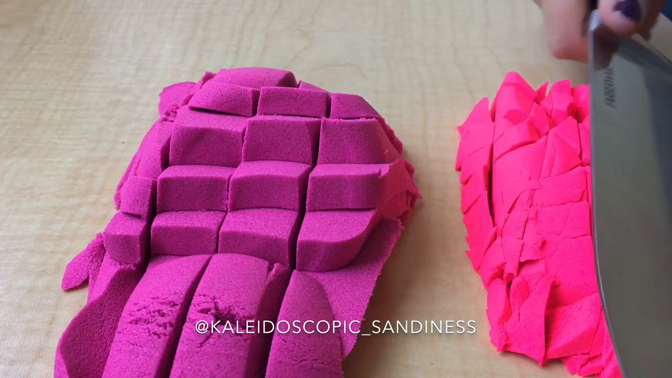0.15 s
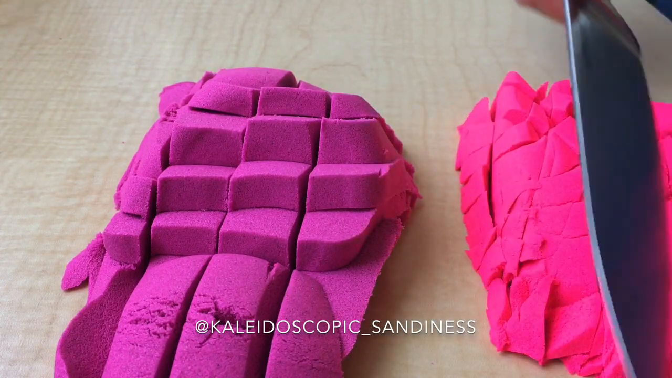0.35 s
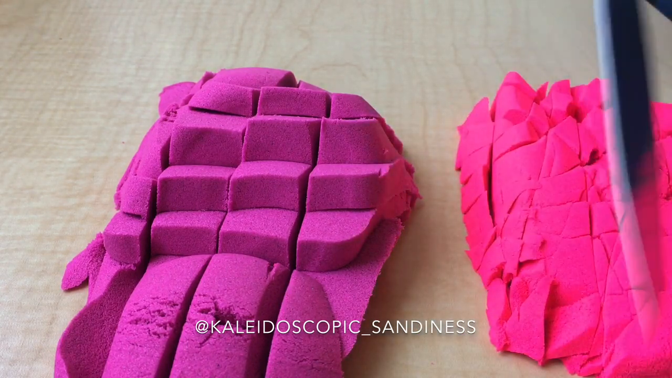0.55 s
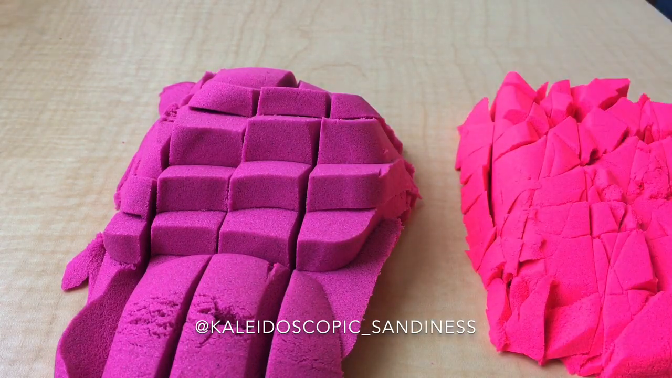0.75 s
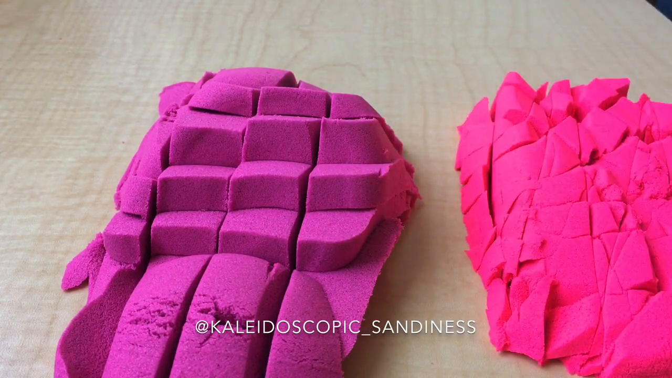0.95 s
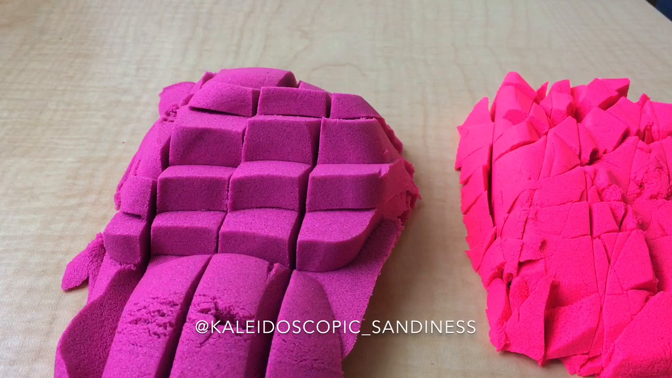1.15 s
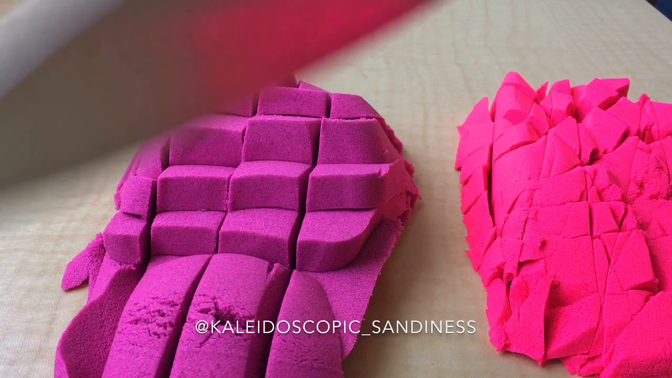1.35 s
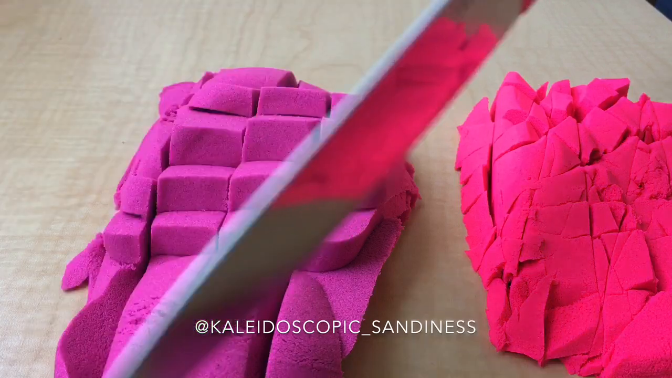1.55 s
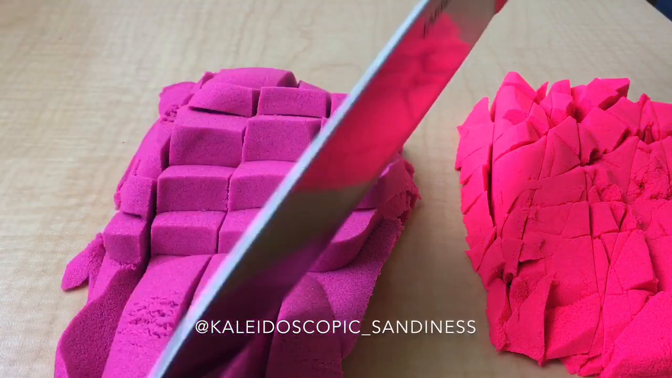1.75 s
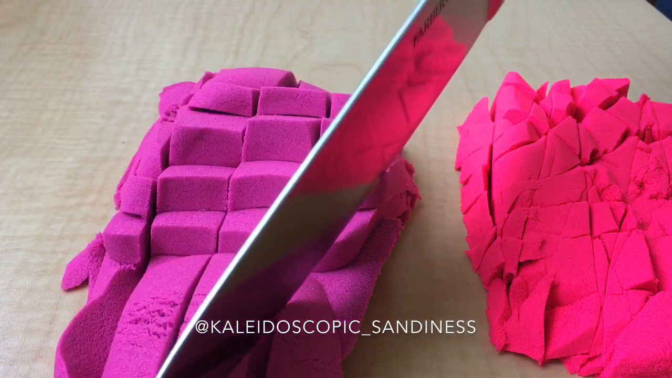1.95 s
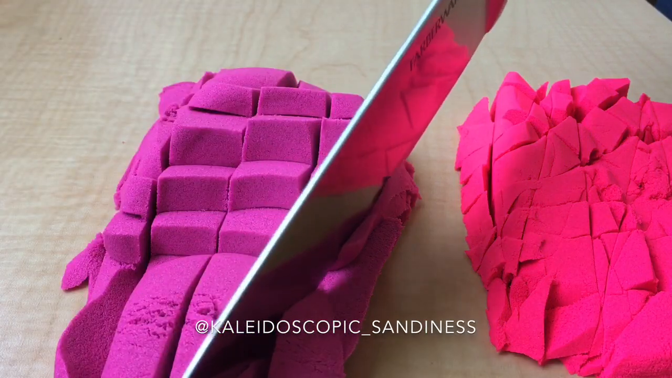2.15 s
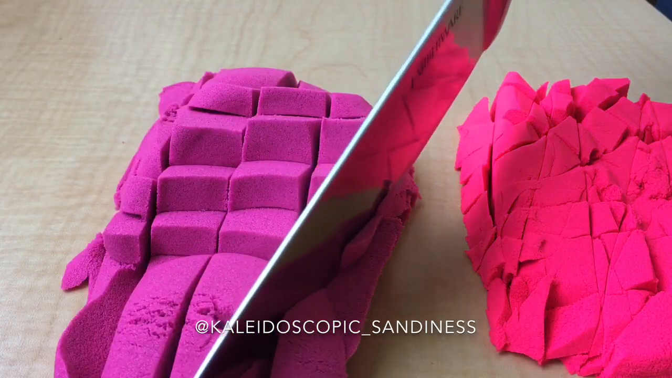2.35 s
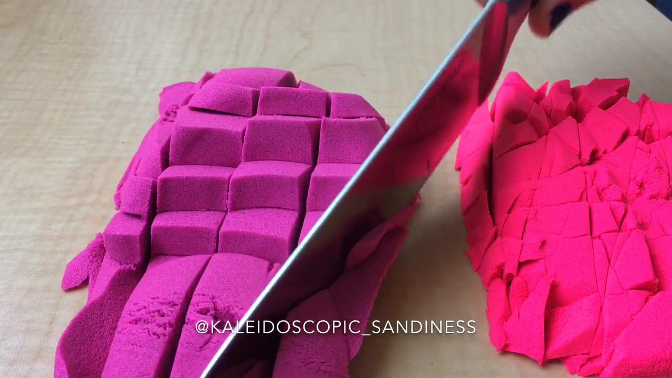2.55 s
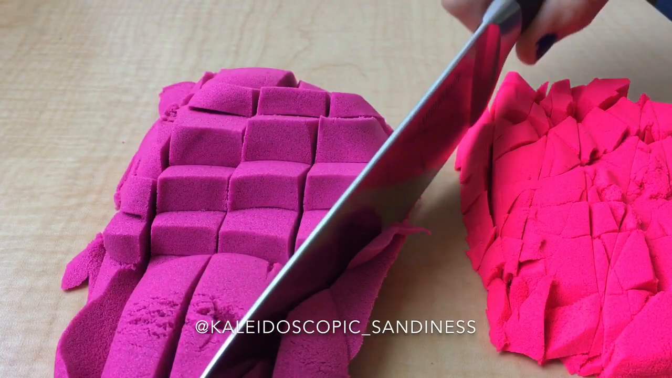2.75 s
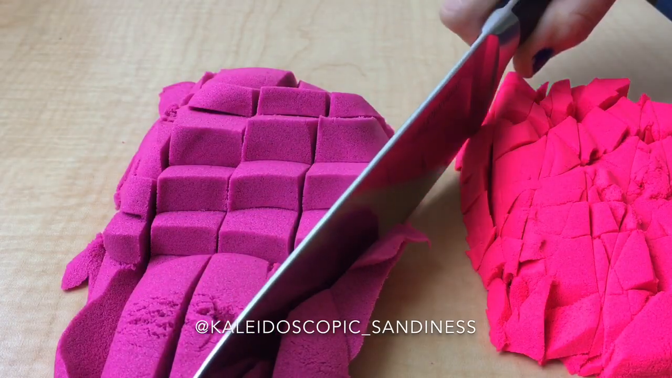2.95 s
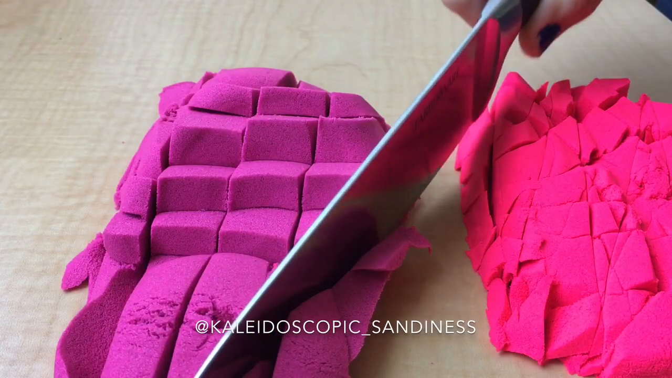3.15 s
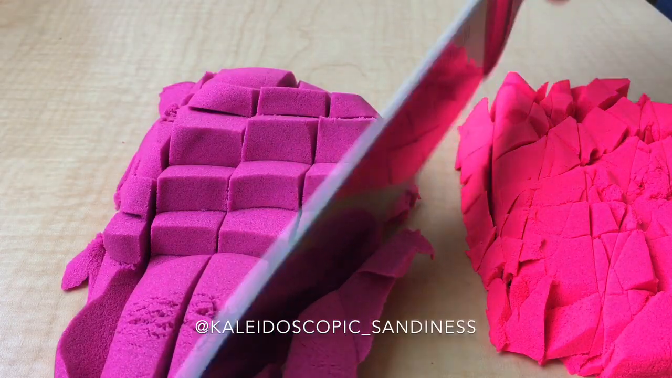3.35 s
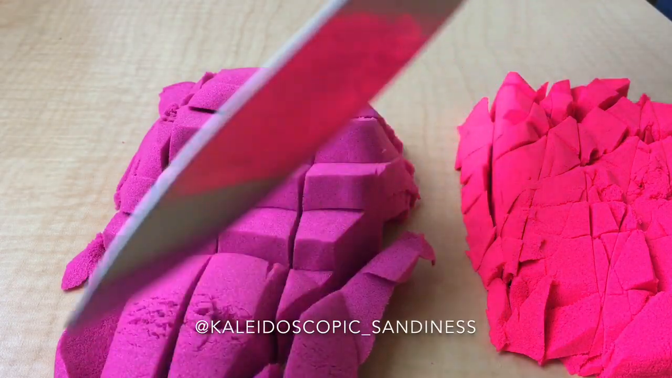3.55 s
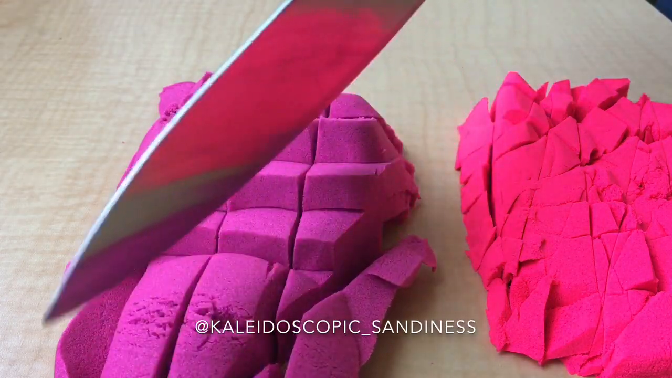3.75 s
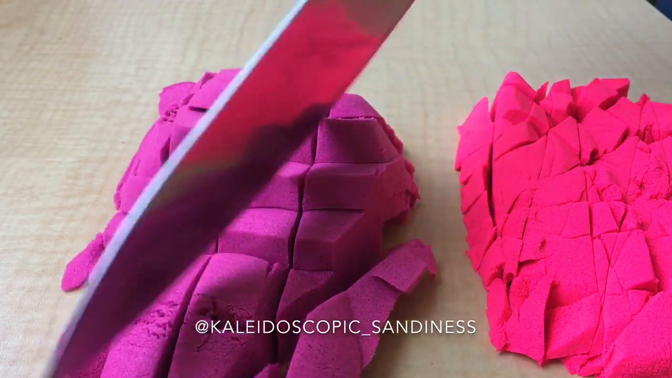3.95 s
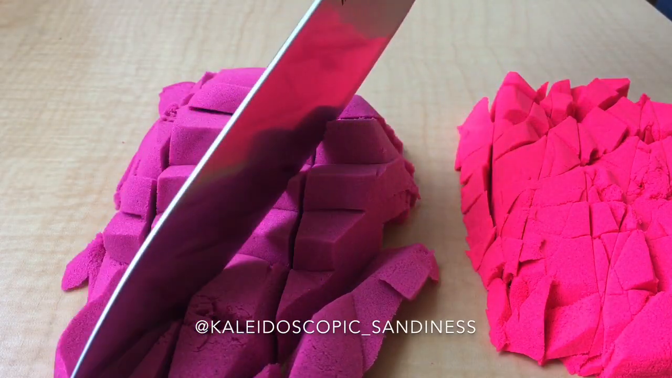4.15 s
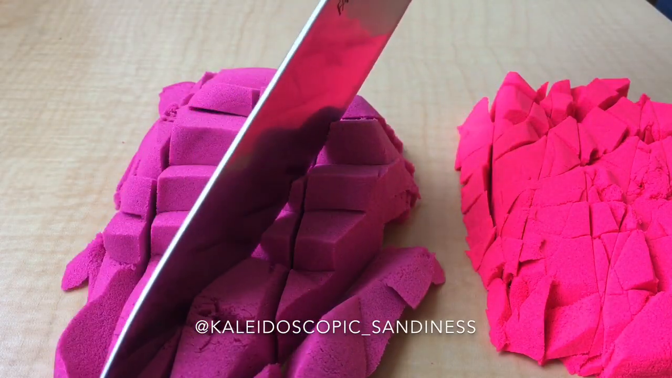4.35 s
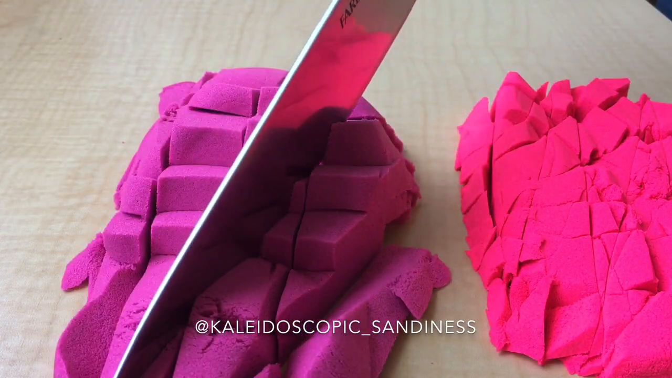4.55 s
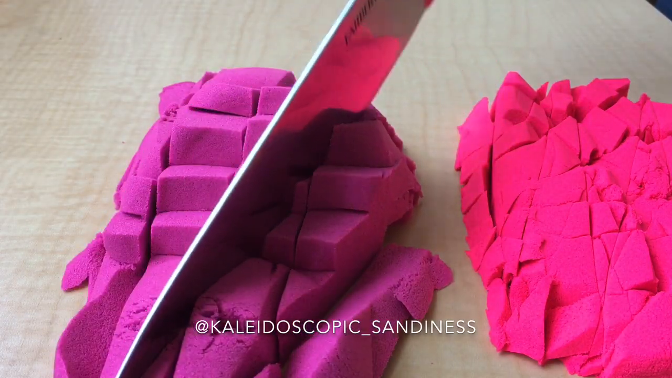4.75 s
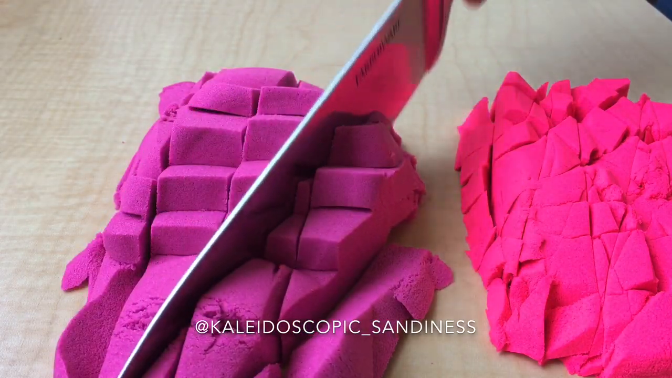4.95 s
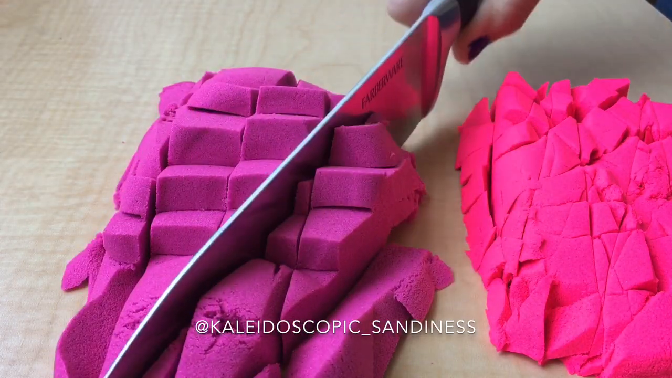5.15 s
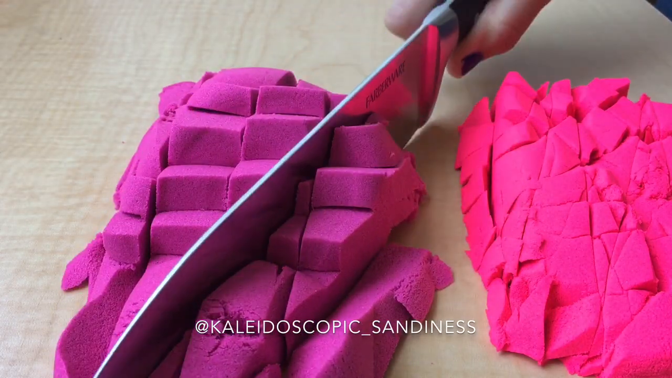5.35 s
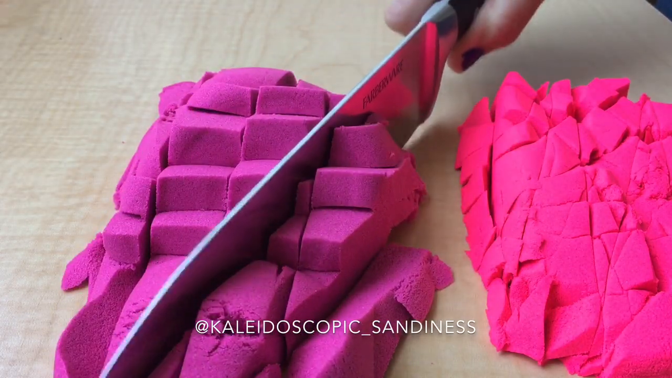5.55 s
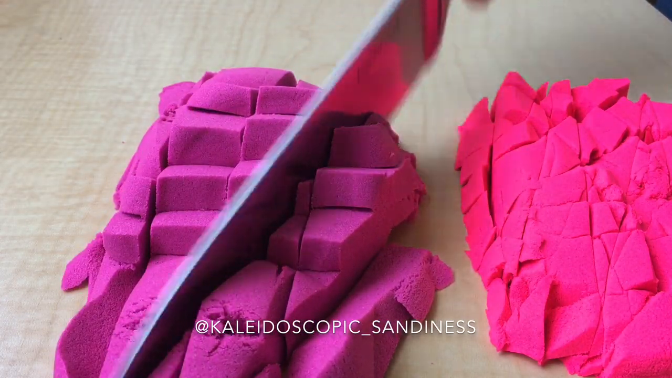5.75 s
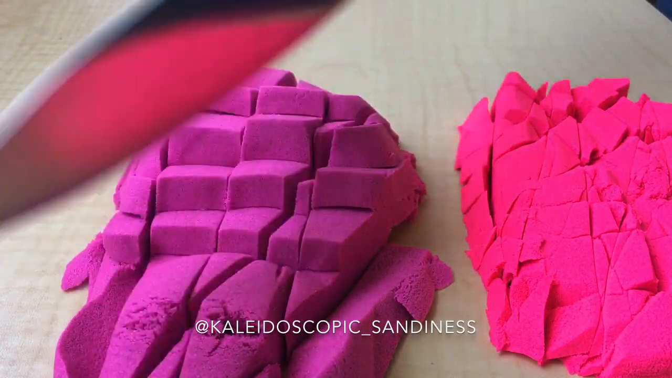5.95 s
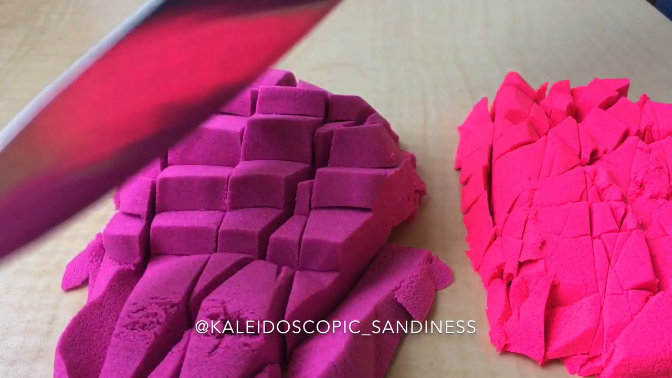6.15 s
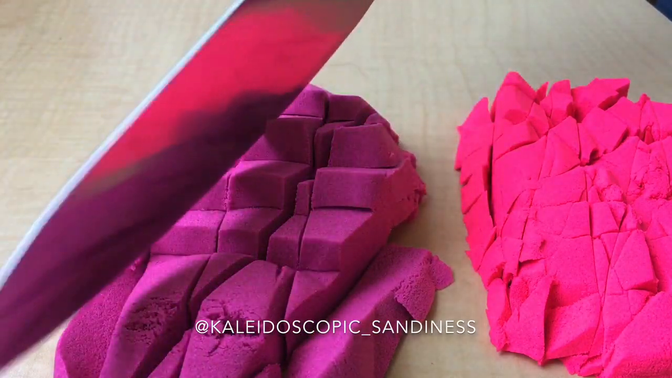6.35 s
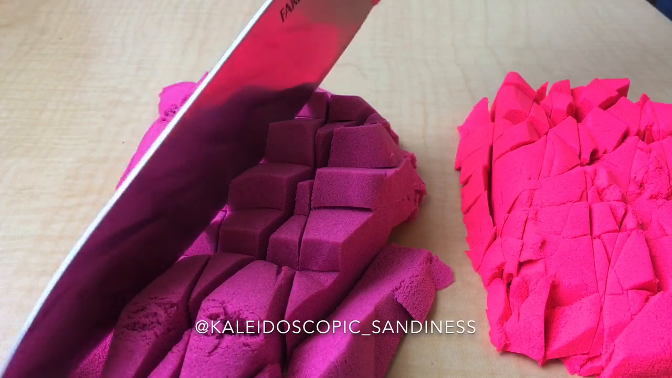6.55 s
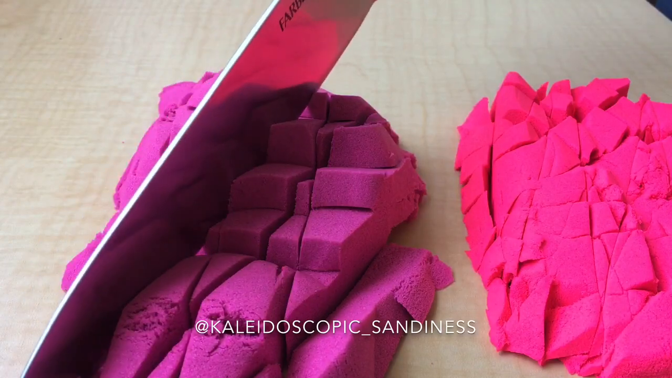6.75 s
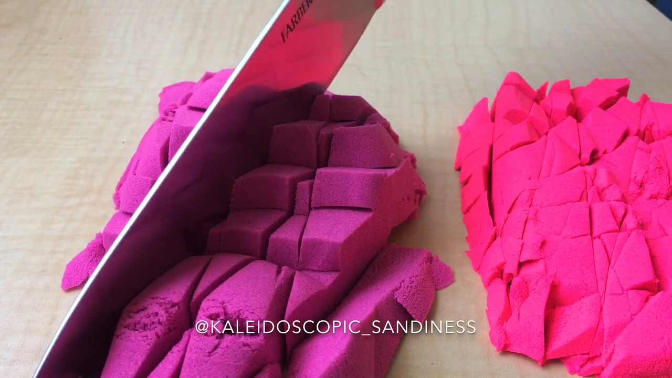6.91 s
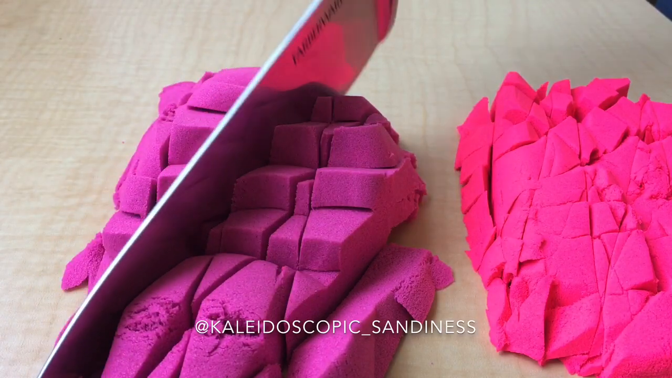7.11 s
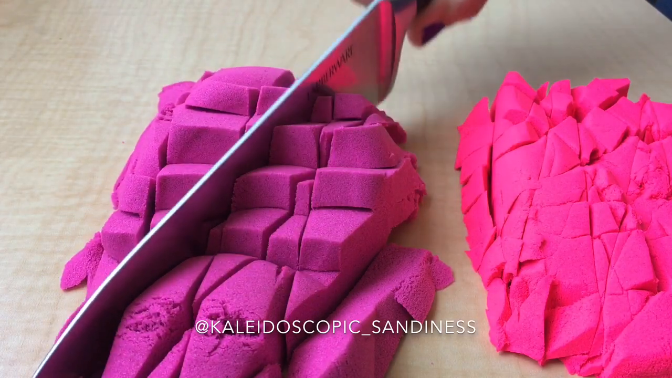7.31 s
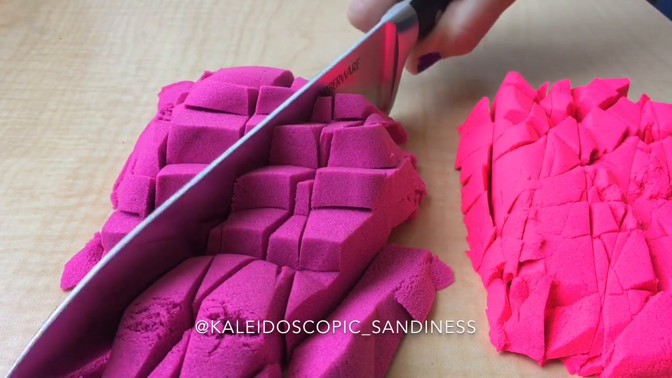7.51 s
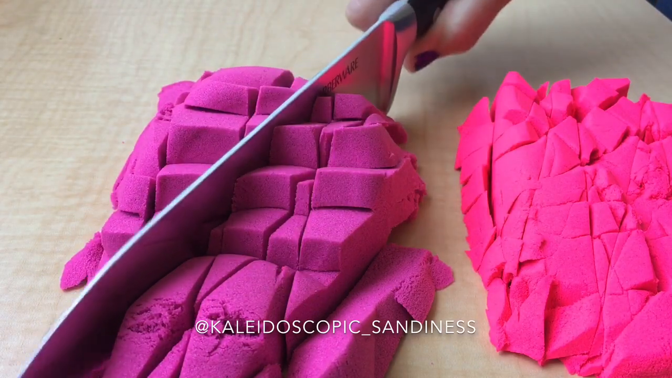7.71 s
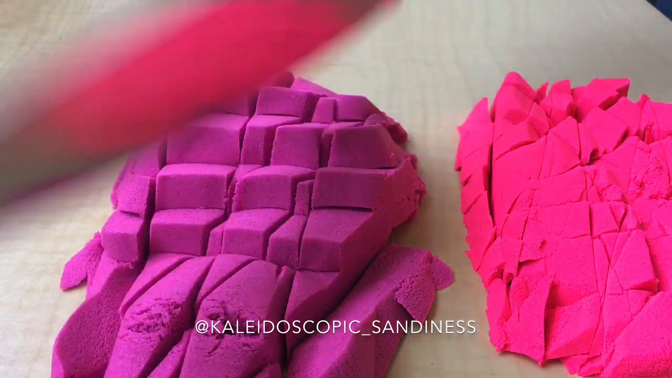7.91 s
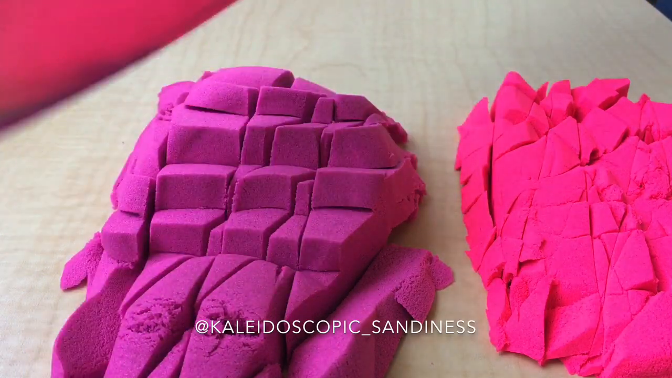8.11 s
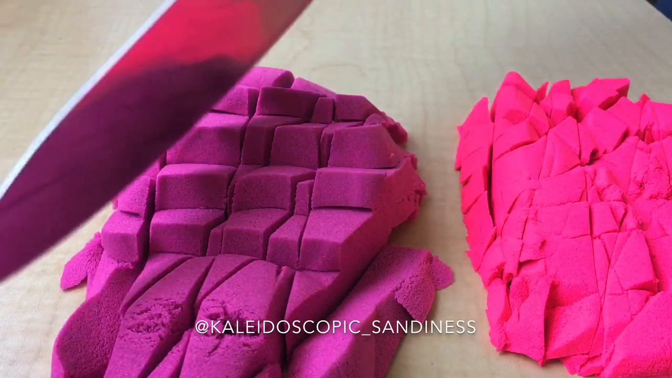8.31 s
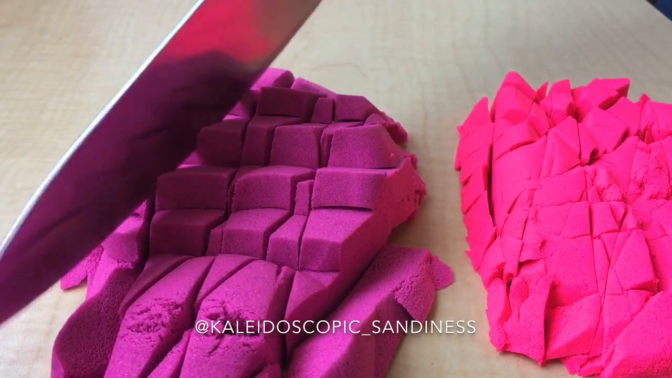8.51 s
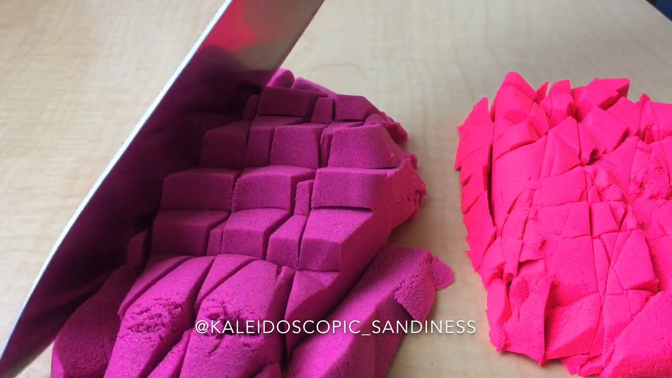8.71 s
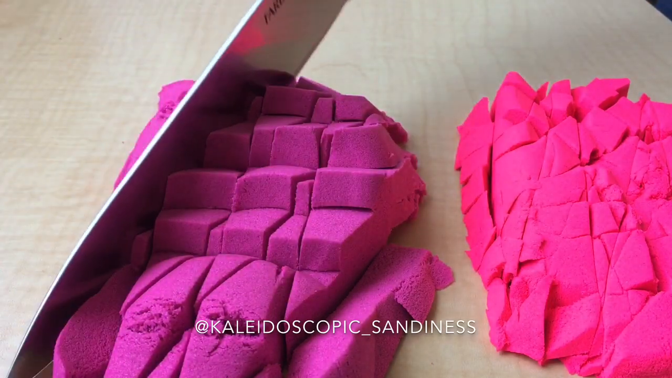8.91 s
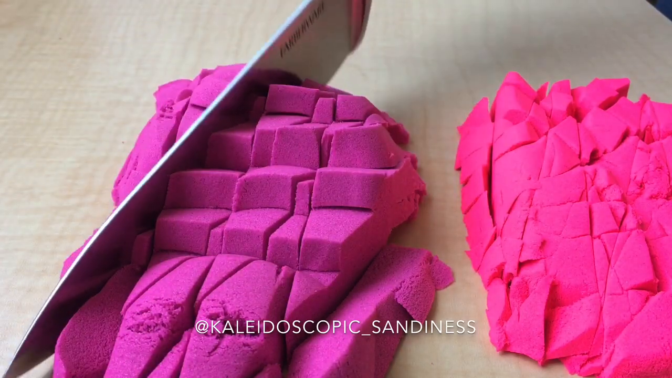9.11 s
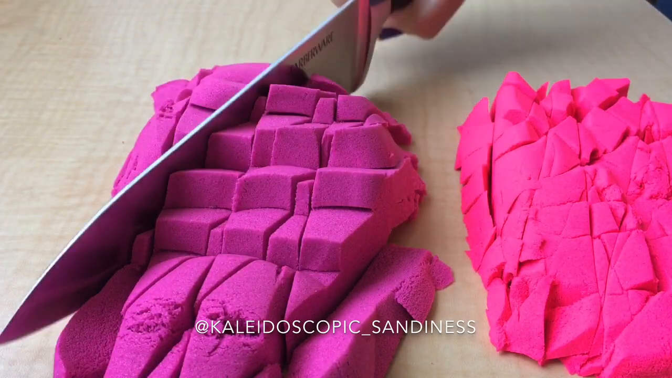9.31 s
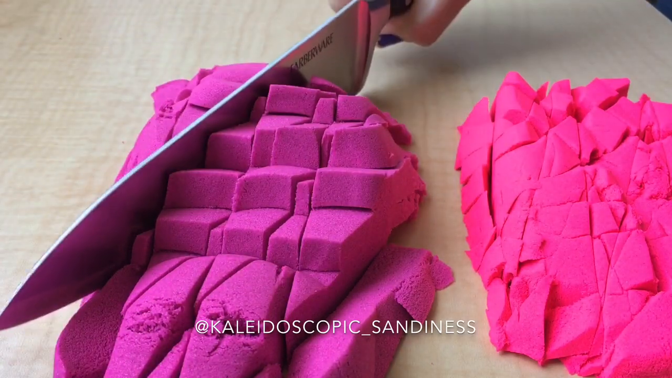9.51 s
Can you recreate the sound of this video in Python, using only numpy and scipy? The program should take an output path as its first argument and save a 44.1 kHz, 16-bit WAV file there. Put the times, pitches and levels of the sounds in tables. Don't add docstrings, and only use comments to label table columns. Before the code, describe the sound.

Close up, a blade hisses into packed sand and crunches through in four crisp crackling bursts, knocking the wood beneath, over faint room hum.

```python
import sys
import numpy as np
from scipy import signal
from scipy.fft import rfft, irfft
from scipy.io import wavfile
from scipy.ndimage import uniform_filter1d

SR = 44100
rng = np.random.default_rng(int(sys.argv[2]) if len(sys.argv) > 2 else 0)


def volts_from_decibels(level):
    exponent = np.asarray(level, float) / 20
    return 10 ** exponent


def master(y):
    cut = np.clip(np.atleast_2d(y).T, -1, 1)
    pcm = np.round(cut * 32767)
    wavfile.write(sys.argv[1], SR, pcm.astype(np.int16))


N = 426447

# (frequency [Hz], level [dB per Hz])
AIR = [(41, -32.5), (70, -6.5), (87, -7), (188, -14), (217, -36.5), (293, -25), (395, -41), (894, -49.5),
       (998, -42), (1550, -42), (3000, -80.5)]
# (time [s], level [dB])
HUM = [(0.0, -44), (0.78, -43), (0.86, -49), (1.61, -40), (1.96, -47), (3.5, -43.5), (3.66, -59.5),
       (4.07, -37), (4.25, -48.5), (4.85, -38), (5.33, -52), (5.66, -41.5), (6.52, -41), (6.63, -48.5),
       (8.0, -40.5), (8.24, -56.5), (8.59, -45), (9.67, -47.5)]
# (frequency [Hz], width [Hz], level [dB])
WHINE = [(104.4, 6.9, -51), (185.6, 12, -59.5), (292.2, 3.3, -68), (1030, 8, -72.5), (1540, 16, -74.5)]
# (frequency [Hz], level [dB per Hz])
HISS = [(1180, -36), (2000, -18.5), (4550, -11), (4790, -36.5), (5380, -10), (7650, -11.5), (15100, -4),
        (16500, -14)]
AIR_DB, HISS_DB = -50.5, -73
HUM_HZ, HUM_WIDTH_HZ = 57.7, 2
ROOM_T60_S, ROOM_DB = 0.34, -12
LOW_CUT_HZ, TOP_HZ = 37, 15800

# (time [s], level [dB])
FAINT_HISS = [
    [(7.87, -61), (8.268, -64.5)],
]

# (edge touches [s], pack starts to give [s], edge is through [s], blade is clear [s], hand's weight [dB])
SLICES = [
    (1.871, 2.34, 3.05, 3.4, -53.5),
    (4.04, 4.678, 5.55, 5.94, -50),
    (6.315, 6.948, 7.63, 8.01, -48),
    (8.432, 8.908, 9.34, 12.9, -46.5),
]
LEAN_DB, EASE_S, EASE_DB = -5, 0.14, -11
SINK_S = 0.25
PUSH_DB = (-93, -60, -64, -50.5, -63.5)
BARE_DB = (17, -8, -14, -14, 18)
CHOP_PUSH_DB, CHOP_BARE_DB, CHOP_END_S = -99, 9, 1

# (frequency [Hz], level [dB], decay t60 [s])
TABLE = [(530, -12, .07), (790, 0, .045), (940, -3, .05), (1100, -4, .04), (1310, -4, .045),
         (1470, -6, .045), (1640, -1, .045), (1850, -4, .04), (2150, -6, .03), (2450, -12, .03)]
# (time [s], frequency [Hz])
ANSWER = [
    [(2.3, 1500), (2.968, 1490), (3.05, 1070)],
    [(4.66, 1280), (5.18, 1560), (5.5, 1410)],
    [(6.94, 800), (7.212, 1610), (7.66, 1000)],
    [(8.9, 1300), (9.2, 1570), (9.52, 980)],
]
HARD_DB_PER_OCTAVE, PIVOT_HZ = 13.5, 1215
HEEL_S = (2.86, 5.24, 7.42, 9.24)
HEEL_RAMP_S, HEEL_STAY_S = 0.07, 0.4
HEEL_DB, MUTE_DB, DETUNE = 9, 8, 0.053
MUTED_FROM_HZ, MUTED_TO_HZ = 880, 1200

# (time [s], low peak [dB], dull knock [dB], hard knock [dB], knock tone [Hz])
THUDS = [(2.319, -19.5, -26.5, -19, 1803), (2.674, -22, -13, -10, 790), (2.83, -41.5, -24, -14, 1686),
         (4.671, -19, -41, -30.5, 1500), (4.804, -22.5, -18.5, -21, 1500), (4.896, -18.5, -31, -40, 825),
         (4.954, -18.5, -19, -10.5, 740), (5.1602, -27, -12, -6, 1672), (5.834, -34.5, -40.5, -55, 790),
         (6.955, -23, -35.5, -36, 806), (7.162, -17.5, -23, -13, 1963), (7.308, -56.5, -29, -16, 1680),
         (7.37, -40, -16, -13, 1710), (7.864, -19.5, -21.5, -12, 1293), (7.868, -42, -13.5, -28.5, 682),
         (8.916, -25.5, -28, -27.5, 1920), (9.162, -17.5, -16.5, -14, 792)]
THUD_HZ = 207.2

# (frequency [Hz], level [dB], decay t60 [s])
BLADE = [(5690, -18, 0.28), (9190, -8, 0.2), (6720, -16, 0.22), (7876, -16, 0.18), (8586, -22, 0.22),
         (9464, -23, 0.36), (10700, -16, .15), (11540, -5, 0.22), (11600, -19, 0.89), (12300, -8, .15),
         (12690, 0, 0.19), (13820, -2, 0.18), (15010, -3, 0.12), (14200, -5, 0.13)]
# (frequency [Hz], width [Hz], level [dB])
GRIPPED = [(6100, 190, -10), (9440, 400, 4), (11000, 150, 19.5), (12180, 990, 10), (14130, 150, 6.5),
           (15900, 140, 16.5)]
# (frequency [Hz], level [dB per Hz])
GRIT = [(1290, -12), (2200, -0.5), (4980, -7.5), (5750, -2.5), (7530, -7.5), (9220, -4.5), (14400, 1),
        (16500, -10)]
# (frequency [Hz], level [dB per Hz])
GLIDE = [(1290, -14.5), (2200, -16.5), (3410, -16), (6100, -13), (9950, -9), (14700, 0), (16100, -4.5),
         (16500, -28)]
# (frequency [Hz], width [Hz], level [dB])
BANDS = [(5700, 44, -11), (6700, 32, -9), (7890, 53, -6), (8600, 33, -13), (9200, 74, -2), (9500, 44, -13),
         (10600, 110, -7), (11600, 51, -2), (12300, 58, 0), (12700, 75, -7), (13300, 96, -7),
         (14100, 84, -2), (15000, 240, -4), (15600, 53, -3)]
# (frequency [Hz], width [Hz], level [dB])
CHOP_BANDS = [(2590, 60, -26), (4420, 50, -20), (4780, 60, -19), (6250, 34, -16), (7790, 90, -16),
              (12500, 60, -8), (8870, 120, -8), (10200, 46, -2), (11700, 130, -3), (12900, 88, -6),
              (13200, 100, -1), (14100, 86, -5), (14800, 160, 0)]
FLUTTER_DB, FLUTTER_S = 3.2, 0.05
# (time [s], scuff peak [dB], scuff length [s], ring [dB], tilt [dB per octave])
PINGS = [(0.163, -38.5, 0.025, -44, 6), (0.377, -25.5, 0.029, -60, 4), (0.468, -34.5, 0.05, -60, 8),
         (0.595, -62, 0.0099, -49, 1), (0.916, -58, 0.026, -80, -2), (1.12, -53, 0.0018, -59, 0),
         (5.731, -42, 0.012, -58, 6), (1.26, -55, 0.043, -61, -9), (1.865, -38.5, 0.0085, -70, -3),
         (3.207, -30, 0.01, -60, -3), (3.371, -43, 0.019, -53, -12), (3.415, -61, 0.005, -65, 1),
         (3.494, -52, 0.0097, -54.5, 2), (3.532, -48, 0.01, -48, 4), (3.726, -43.5, 0.0044, -71.5, 1),
         (4.057, -38.5, 0.052, -52, 18), (5.877, -47, 0.018, -52.5, 3), (5.922, -57, 0.0051, -54.5, -6.5),
         (6.312, -35, 0.016, -46.5, -5), (7.946, -38, 0.01, -44, -9), (7.975, -72, .004, -44, -11),
         (8.429, -30.5, 0.012, -42.5, -5), (9.626, -39, 0.011, -59, 10)]
# (time [s], frequency [Hz], level [dB], decay t60 [s])
FLEX = (3.535, 3978, -63, .45)
# (time [s], level [dB])
GLIDES = [
    [(0.168, -57), (0.368, -41), (0.46, -47), (0.595, -51.5), (0.625, -75)],
    [(1.867, -59.5), (2.159, -48.5), (2.316, -46.5)],
    [(3.0, -72), (3.22, -54), (3.3, -68), (3.39, -55), (3.44, -81)],
    [(4.055, -55), (4.253, -44.5), (4.393, -50), (4.66, -57)],
    [(5.48, -56), (5.58, -66), (5.78, -65), (5.83, -54), (5.93, -57)],
    [(6.316, -52), (6.508, -45.5), (6.676, -50), (6.94, -51)],
    [(7.63, -63), (7.906, -56), (8.0, -70)],
    [(8.433, -65), (8.51, -46), (8.57, -43.5), (8.713, -46.5), (8.9, -46.5)],
    [(9.5, -43), (9.558, -55), (9.67, -68)],
]
LIFT_S = 0.018

# (time [s], level [dB])
LOAD = [
    [(2.316, -58), (2.51, -68), (2.56, -42), (2.703, -48), (2.753, -38.5), (2.825, -42), (2.865, -32),
     (3.0, -51.5)],
    [(4.66, -38), (4.694, -63), (4.976, -35.5), (5.144, -44.5), (5.308, -30), (5.338, -33.5), (5.48, -42)],
    [(6.94, -68), (7.218, -38), (7.334, -30.5), (7.438, -38), (7.492, -33), (7.594, -37.5), (7.63, -42)],
    [(8.9, -49), (9.03, -54), (9.136, -42.5), (9.268, -25), (9.31, -24), (9.346, -28.5), (9.5, -30)],
]
LOAD_HISS_DB, LOAD_PUSH_DB, RUB_DB = -2.5, -5, -53

# (time [s], treble peak [dB], table peak [dB])
FIRST = [(2.4322, -16, -27.5), (2.5172, -18.5, -30.5), (2.523, -17.5, -38.5), (2.5286, -13.5, -21),
         (2.5311, -5.5, -18.5), (2.5441, -15.5, -26), (2.5537, -12.5, -20.5), (2.5654, -11, -18.5),
         (2.5682, -8.5, -13), (2.582, -4.5, -12), (2.6168, -9.5, -32.5), (2.621, -16.5, -41),
         (2.6403, -18, -25.5), (2.6494, -23, -28.5), (2.6611, -5, -17.5), (2.6726, -8, -2),
         (2.6783, -12.5, -16), (2.6828, -14.5, -22.5), (2.6924, -15.5, -24.5), (2.6973, -14, -25.5),
         (2.7008, -9.5, -24.5), (2.7034, -14.5, -23), (2.7152, -16, -23.5), (2.7426, -3, -10.5),
         (2.7463, -6.5, -13.5), (2.7655, -7, -21.5), (2.7682, -10, -21), (2.7784, -4, -25.5),
         (2.785, -10.5, -28), (2.7929, -12, -20), (2.7963, -15, -23.5), (2.8112, -16, -31.5),
         (2.8185, -8, -18), (2.8306, -4, -5.5), (2.8325, -10.5, -19.5), (2.8356, -6, -27.5),
         (2.845, -12.5, -34), (2.8682, -14, -35), (2.8741, -10.5, -28.5), (2.88, -6, -29),
         (2.8972, -9.5, -19.5), (2.903, -9, -24), (2.9067, -17.5, -37.5), (2.9237, 0.5, -8.5),
         (2.9273, -6.5, -18.5), (2.935, -10.5, -30), (2.9396, -12, -38.5), (2.9489, 1.5, -12),
         (2.9862, -28, -26), (2.9942, -14, -23)]
# (time [s], treble peak [dB], table peak [dB])
SECOND = [(4.6688, -23, -22.5), (4.673, -39, -32.5), (4.801, -23, -32), (4.8226, -16.5, -33.5),
          (4.8464, -21, -40.5), (4.864, -21.5, -32), (4.872, -22, -36.5), (4.8986, -12, -10.5),
          (4.909, -27, -31), (4.9521, -8.5, -10.5), (5.001, -18.0, -17.5), (5.0048, -9.5, -25),
          (5.0175, -12, -26.5), (5.037, -29, -29.5), (5.057, -21, -35.5), (5.0733, -20, -30),
          (5.0923, -8.5, -19), (5.0986, -17, -38), (5.104, -20.5, -31), (5.145, -12.5, -22),
          (5.1482, -6, -10), (5.1573, 2, -13.5), (5.1605, -4, -7), (5.1782, -23, -15.5), (5.1858, -10, -28),
          (5.2027, -24, -19), (5.2072, -16, -16.5), (5.214, -15, -21), (5.2166, -19, -30),
          (5.2276, -25, -35), (5.2551, -4.5, -17), (5.264, -9, -36.5), (5.2824, -10, -17), (5.294, -8, -26),
          (5.301, -7, -18), (5.3055, -19, -30), (5.318, -27, -20), (5.3219, -22, -31), (5.3332, -9.0, -20),
          (5.345, -10.5, -24), (5.3537, -14, -16.5), (5.3627, -13, -24), (5.383, -31, -24),
          (5.392, -30, -43), (5.398, -27, -34), (5.404, -26, -45), (5.4155, -21, -35), (5.42, -24, -23.5),
          (5.4264, -4.5, -18.5), (5.4445, -11, -18.5), (5.4575, -9, -19), (5.4687, -18, -45)]
# (time [s], treble peak [dB], table peak [dB])
THIRD = [(6.9533, -15.5, -31), (6.957, -15.5, -34), (6.9618, -16, -21), (6.9657, -19, -21.5),
         (7.1593, -5.5, -8.5), (7.1683, -9, -13.5), (7.1714, -14, -22), (7.19, -12.5, -15.5),
         (7.228, -23, -27), (7.236, -24, -36), (7.2435, -22, -25), (7.2474, -13, -38.0),
         (7.254, -17, -21.5), (7.2622, -22, -27), (7.2715, -23, -30), (7.2783, -23, -23), (7.301, -29, -32),
         (7.3035, -16, -21), (7.3077, -4, -10.5), (7.3368, -13, -22), (7.3396, -14, -17),
         (7.3532, -6.5, -13), (7.3599, -6.5, -11), (7.3666, -9.5, -11), (7.3701, -0.5, -7),
         (7.3799, -8.5, -8.5), (7.3872, -11.5, -23), (7.3907, -5.5, -13.5), (7.3995, -14, -24),
         (7.4056, -12, -30), (7.415, -18, -26), (7.422, -19.5, -33), (7.43, -16, -25), (7.46, -23, -31),
         (7.4635, -13, -21), (7.482, -10, -14.5), (7.4948, -22.5, -16.5), (7.4975, -10, -16),
         (7.5086, -11, -11.5), (7.5215, -5, -24), (7.538, -27, -36), (7.542, -12, -30),
         (7.5451, -15, -37.0), (7.5567, -22, -20), (7.567, -25, -29), (7.576, -2.0, -12.5),
         (7.588, -10, -15.5), (7.615, -24, -37), (7.6176, -25, -37), (7.6213, -20.5, -36),
         (7.6308, -22, -38), (7.6496, -26, -30), (7.864, -2, -35)]
# (time [s], treble peak [dB], table peak [dB])
FOURTH = [(9.0475, -26, -35), (9.0605, -15, -18), (9.08, -14, -16), (9.0968, -24, -40.5),
          (9.1423, -15, -19.5), (9.152, -27, -32), (9.1563, -7, -24), (9.1595, -9, -8.5),
          (9.1635, -16, -25), (9.1937, -14.5, -18), (9.1974, -17, -29), (9.2078, -15, -18),
          (9.2138, -14.5, -20), (9.2283, -25, -31), (9.2373, -14, -23), (9.241, -20, -24),
          (9.2514, -9, -14.5), (9.254, -12, -14), (9.2647, -7, -12), (9.2731, -16.5, -21),
          (9.278, -20, -12), (9.2834, -8, -12), (9.2928, -14, -15), (9.2993, -19, -30), (9.3018, -19, -22),
          (9.3117, -18, -22), (9.3157, -15, -13), (9.3193, -8, -7), (9.3275, -12, -26), (9.3348, -19, -28),
          (9.356, -21, -20), (9.3685, -10, -21.0), (9.3815, -17, -12), (9.3848, -14, -32),
          (9.389, -14, -23), (9.3956, -11, -8), (9.4034, -15, -36), (9.409, -10, -15), (9.4336, -4, -19),
          (9.4367, -1.5, -37), (9.4483, -9, -12.5), (9.4636, -14, -30), (9.476, -11.5, -20),
          (9.4895, -17, -27)]
# (time [s], treble peak [dB])
TICKS = [(3.2138, -28), (3.155, -35), (3.3485, -33), (3.225, -36), (5.5605, -31.5), (5.6391, -33),
         (5.7825, -21), (4.652, -41), (3.142, -42), (3.385, -38), (7.7612, -25.5), (7.788, -43),
         (7.805, -19), (7.832, -26.5)]
TICK_TABLE_DB = -10
TICK_RING_DB, TICK_DAMPING = -8, 9.0
THIN_HZ, THIN_SHARE, REACH_DB = 4630, 0.25, 5
SNAP_S, SNAP_GROWTH = 0.00105, 0.12
SNAP_RISE_S = 0.0002
ECHO_S, ECHO_SHARE = 0.0006, 0.5


def level(x, db):
    return x * volts_from_decibels(db) / np.sqrt(np.mean(x ** 2))


def band(x, hz, width_hz):
    return signal.lfilter(*signal.iirpeak(min(hz, 0.45 * SR), hz / width_hz, SR), x)


def colour(x, points):
    hz, db = np.transpose(points)
    size = 4096
    grid = np.maximum(np.fft.rfftfreq(size, 1 / SR), 1)
    outline_db = np.maximum(np.interp(np.log(grid), np.log(hz), db), -70)
    cep = irfft(np.log(volts_from_decibels(outline_db)))
    cep[1:size // 2] *= 2
    cep[size // 2 + 1:] = 0
    return signal.oaconvolve(x, irfft(np.exp(rfft(cep))))[:len(x)]


def ring(modes, scatter_db, damping=1, rise_s=0.00027, count=1536):
    hz, db, t60 = np.transpose(modes)[:, :, None]
    t = np.arange(count) / SR
    gain = volts_from_decibels(db + scatter_db * rng.standard_normal(hz.shape))
    waves = np.sin(2 * np.pi * (hz * t + rng.random(hz.shape)))
    decay = np.exp(-np.log(1000) * t * damping / t60)
    y = (1 - np.exp(-t / rise_s)) * (gain * waves * decay).sum(0)
    return y / np.abs(y).max()


def add(out, s, x):
    i = int(s * SR)
    out[i:i + len(x)] += x[:N - i]


def grains(coarse_db, per_s):
    hit = rng.random(N) < per_s / SR
    size_db = coarse_db * np.minimum(rng.exponential(size=N), 4)
    return hit * rng.standard_normal(N) * volts_from_decibels(size_db)


def walk(per_s):
    k = int(SR / per_s)
    steps = np.repeat(rng.standard_normal(N // k + 1), k)
    return 1.3 * uniform_filter1d(steps, k)[:N]


def gains(tables):
    t = np.arange(N) / SR
    out = np.zeros((len(tables[0][0]) - 1, N))
    for rows in tables:
        s, *columns = np.transpose(rows)
        on = (t > s[0]) & (t <= s[-1])
        out[:, on] = [volts_from_decibels(np.interp(t[on], s, db)) for db in columns]
    return out


def room_tone():
    s, db = np.transpose(HUM)
    t = np.arange(N) / SR
    hum = np.sin(2 * np.pi * np.cumsum(HUM_HZ + HUM_WIDTH_HZ * walk(6)) / SR)
    hum = level(hum, 0) * volts_from_decibels(np.interp(t, s, db))
    whine = sum(level(band(rng.standard_normal(N), hz, width), db) for hz, width, db in WHINE)
    air = level(colour(rng.standard_normal(N), AIR), AIR_DB)
    hiss = level(colour(rng.standard_normal(N), HISS), HISS_DB)
    return hum + whine + air + hiss


def faint_hiss():
    return gains(FAINT_HISS)[0] * level(band(rng.standard_normal(N), 3000, 11000), 0)


def groan():
    rub = rng.standard_normal(N) * volts_from_decibels(3.2 * walk(30))
    weight = [[(touch, db + LEAN_DB), (bite, db), (through - EASE_S, db), (through + 0.05, db + EASE_DB)]
              for touch, bite, through, _, db in SLICES]
    low = level(band(band(rub, 190, 180), 190, 180), -0.054)
    high = level(band(band(rub, 520, 300), 520, 300), -11)
    return gains(weight)[0] * (low + high)


def hardness():
    return gains([[(s, HARD_DB_PER_OCTAVE * np.log2(hz / PIVOT_HZ)) for s, hz in rows] for rows in ANSWER])[0]


def heel_down():
    t = np.arange(N) / SR
    return sum(np.clip((t - s) / HEEL_RAMP_S, 0, 1) * (t < s + HEEL_STAY_S) for s in HEEL_S)


def table_top(rub, hard, heel=0):
    parts = TABLE[:2], TABLE[2:4], TABLE[4:]
    low, mid, sharp = (level(sum(volts_from_decibels(db) * band(rub, hz, 7 / t60) for hz, db, t60 in part), 0)
                       for part in parts)
    dull = low * volts_from_decibels(-HEEL_DB * heel) + mid * volts_from_decibels(MUTE_DB * heel)
    return volts_from_decibels(-8.5) * (dull + hard * sharp) / np.sqrt(1 + hard ** 2)


def knock(dull_db, hard_db, tones=(), heel=0):
    crowd = [(hz, -hz / 350 - max(hz - 2500, 0) / 70, 0.025) for hz in rng.uniform(600, 3400, size=20)]
    detune = 1 + DETUNE * rng.standard_normal(len(TABLE + crowd))

    def damped(hz):
        if hz < MUTED_FROM_HZ:
            return HEEL_DB * heel
        return MUTE_DB * (1 - heel) * (hz < MUTED_TO_HZ)

    modes = [(hz, db - damped(hz), t60, d) for (hz, db, t60), d in zip(TABLE + crowd, detune)]
    modes += [(*tone, 1) for tone in tones]
    low = [(hz * d, db, t60) for hz, db, t60, d in modes if hz < 1150]
    high = [(hz * d, db, t60) for hz, db, t60, d in modes if hz >= 1150]
    dull = ring(low, 1.7, damping=1.5, rise_s=0.0017)
    hard = ring(high, 3, damping=1.9, rise_s=0.0027)
    return volts_from_decibels(dull_db) * dull + volts_from_decibels(hard_db) * hard


def thuds():
    out = np.zeros(N)
    edge = np.exp(-np.arange(512) / SR / 0.0044)
    low_modes = [(THUD_HZ, 0, 0.07), (270, -3, 0.07), (360, -4, 0.06), (440, -6, 0.06),
                 (530, -5, 0.06), (660, -4, 0.06), (780, -6, 0.05)]
    for s, db, dull_db, hard_db, knock_hz in THUDS:
        add(out, s, volts_from_decibels(db) * ring(low_modes, 0.48, rise_s=0.00023, count=8192))
        tones = [(knock_hz, 13.5 + 0.6 * hard_db, 0.065), (knock_hz * 1.12, 1, 0.035)]
        add(out, s, knock(dull_db, hard_db + 2.5, tones))
        slap = band(rng.standard_normal(len(edge)) * edge, 2000, 3800)
        add(out, s, volts_from_decibels(hard_db - 7.5) * slap)
    return out


def contact():
    tables = [[(0, CHOP_PUSH_DB, CHOP_BARE_DB), (CHOP_END_S, CHOP_PUSH_DB, CHOP_BARE_DB)]]
    for touch, bite, through, clear, _ in SLICES:
        rows = list(zip((touch, touch + SINK_S, bite, through, clear), PUSH_DB, BARE_DB))
        tables += [rows[:3], rows[3:]]
    push, bare = gains(tables)
    return push * (gains(GLIDES)[0] > 0), bare


def brushed(rub, bare):
    span = int(FLUTTER_S * SR)
    drift = uniform_filter1d(rub, span) * np.sqrt(span)
    sides = []
    for bands in (CHOP_BANDS, BANDS):
        lines = sum(volts_from_decibels(db + FLUTTER_DB * np.roll(drift, 23 * int(hz))) * band(rub, hz, 0.85 * width)
                    for hz, width, db in bands)
        sides.append(level(lines, 0))
    steel_bands = bare * np.where(np.arange(N) < CHOP_END_S * SR, *sides)
    return (level(colour(rub, GLIDE), 0) + steel_bands) / np.sqrt(1 + bare ** 2)


def sliding():
    hiss = gains(GLIDES)[0]
    push, bare = contact()
    rub = level(grains(1, per_s=15000) * volts_from_decibels(walk(70)), 0)
    scuffs, lines = np.zeros((2, N))
    t = np.arange(8192) / SR
    for s, db, lasting_s, ring_db, tilt_db in PINGS:
        add(scuffs, s, volts_from_decibels(db) * (1 - np.exp(-3 * t / lasting_s)) * np.exp(-t / lasting_s))
        modes = [(hz, 0.46 * mode_db + tilt_db * np.log2(hz / 8000), min(t60, 0.45))
                 for hz, mode_db, t60 in BLADE]
        add(lines, s, volts_from_decibels(ring_db) * ring(modes, 2, damping=0.51, count=16384))
    flex_s, flex_hz, flex_db, flex_t60_s = FLEX
    add(lines, flex_s, volts_from_decibels(flex_db) * ring([(flex_hz, 0, flex_t60_s)], 0, count=16384))
    bare = np.where(hiss > 0, bare, 1)
    lift = int(LIFT_S * SR)
    hiss = uniform_filter1d(hiss, lift, origin=lift // 2 - 1)
    on_steel = (hiss + scuffs) * brushed(rub, bare)
    on_table = (push + volts_from_decibels(-60) * scuffs) * table_top(rub, volts_from_decibels(-3))
    return on_steel + lines + on_table


def steel(x):
    x = colour(x, GRIT)
    return x + sum(volts_from_decibels(min(db, 0)) * band(x, hz, max(width, 300)) for hz, width, db in GRIPPED)


def crushing():
    load = gains(LOAD)[0]
    rub = grains(2.8, per_s=8000) * volts_from_decibels(4 * walk(260))
    fine = (load > 0) * level(colour(rng.standard_normal(N), GLIDE), RUB_DB)
    on_steel = volts_from_decibels(LOAD_HISS_DB) * level(steel(rub), 0)
    on_table = volts_from_decibels(LOAD_PUSH_DB) * table_top(rub, hardness(), heel_down())
    return fine + load * (on_steel + on_table)


def snap(db):
    t = np.arange(512) / SR
    lasting_s = SNAP_S * volts_from_decibels(2 * rng.standard_normal() + SNAP_GROWTH * db)
    shape = np.exp(-t / lasting_s) * (1 - np.exp(-t / SNAP_RISE_S))
    burst = rng.standard_normal(512) * volts_from_decibels(3.4 * rng.exponential(size=512)) * shape
    burst = burst - ECHO_SHARE * np.roll(burst, 2 + int(rng.random() * ECHO_S * SR))
    return burst * volts_from_decibels(db) / np.sqrt(np.sum(burst ** 2))


def cracks():
    bright, deep, wood = np.zeros((3, N))
    hard, heel = hardness(), heel_down()
    crumbs = [(s, db - 0.5, db + TICK_TABLE_DB) for s, db in TICKS]
    for s, db, table_db in FIRST + SECOND + THIRD + FOURTH + crumbs:
        burst = snap(db)
        add(bright, s, burst)
        add(deep, s, burst * np.clip(volts_from_decibels(table_db - db + REACH_DB), THIN_SHARE, 1))
        i = int(s * SR)
        lean_db = 10 * np.log10(hard[i] or 1)
        add(wood, s, knock(table_db - 8 - lean_db, table_db - 6 + lean_db, heel=heel[i]))
    blade_modes = [(hz, 0, min(t60, 0.3)) for hz, _, t60 in BLADE]
    for s, db in TICKS:
        add(wood, s, volts_from_decibels(db + TICK_RING_DB) * ring(blade_modes, 3.6, damping=TICK_DAMPING))
    lows = signal.lfilter(*signal.butter(2, THIN_HZ, fs=SR), deep)
    highs = signal.lfilter(*signal.butter(2, THIN_HZ, "high", fs=SR), bright)
    click = np.zeros(2048)
    click[0] = 1
    steel_gain = np.sqrt(np.sum(steel(click) ** 2))
    return steel(lows - highs) / steel_gain * volts_from_decibels(10) + wood


def scene():
    near = sliding() + crushing() + cracks() + thuds() + groan()
    t = np.arange(SR // 2) / SR
    decay = np.exp(-np.log(1000) * t / ROOM_T60_S) * (t > 0.004)
    tail = band(rng.standard_normal(len(t)), 900, 5000) * decay
    wet = signal.oaconvolve(near, tail / np.sqrt(np.sum(tail ** 2)))[:N]
    return (near + volts_from_decibels(ROOM_DB) * wet + room_tone() + faint_hiss())[None]


def roll_off(x):
    return signal.sosfilt(signal.butter(12, 16980, fs=SR, output="sos"), x)


def record(dry):
    x = signal.sosfilt(signal.butter(4, LOW_CUT_HZ, "high", fs=SR, output="sos"), dry)
    x = 0.92 * np.tanh(x / 0.92)
    x = signal.sosfilt(signal.ellip(8, 0.2, 60, TOP_HZ, fs=SR, output="sos"), x)
    return roll_off(x)


dry = scene()
out = record(dry)
master(out)
```